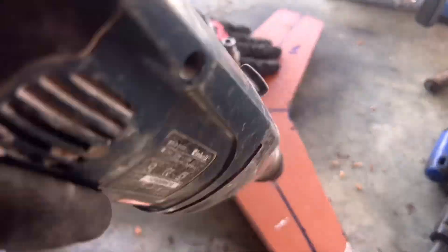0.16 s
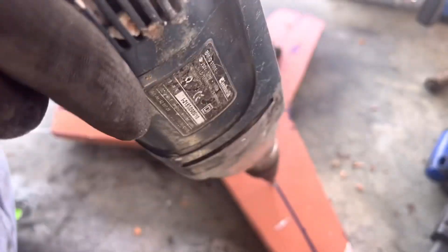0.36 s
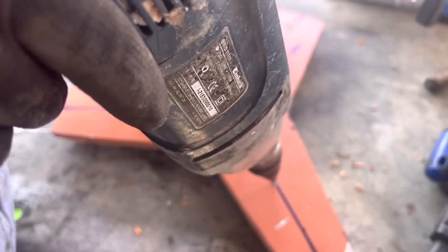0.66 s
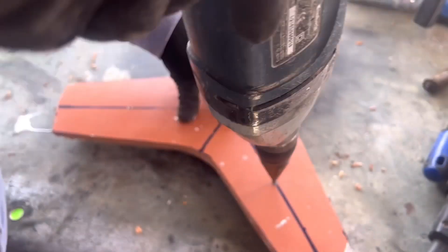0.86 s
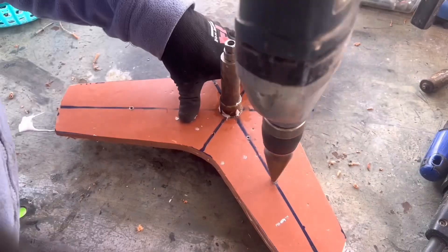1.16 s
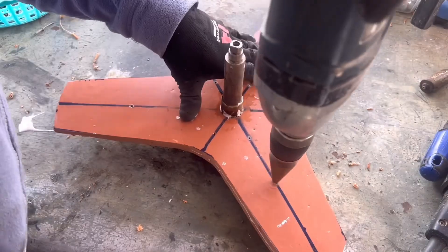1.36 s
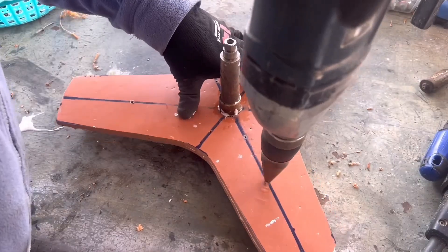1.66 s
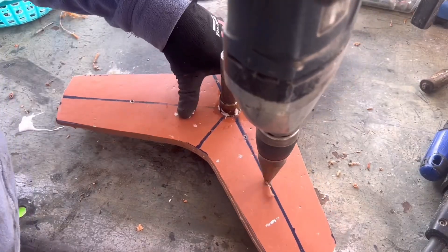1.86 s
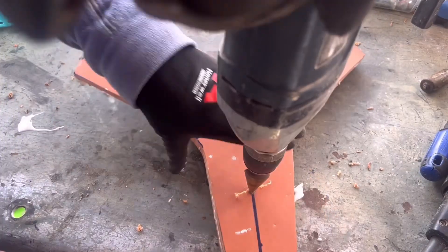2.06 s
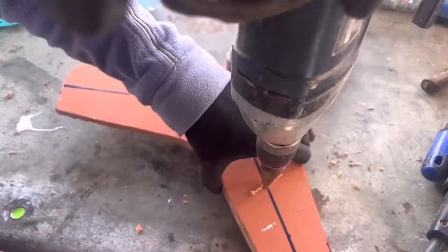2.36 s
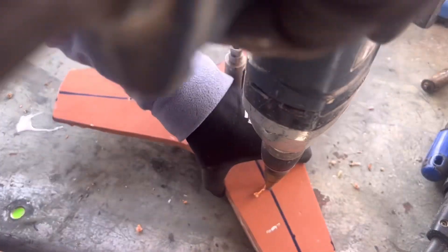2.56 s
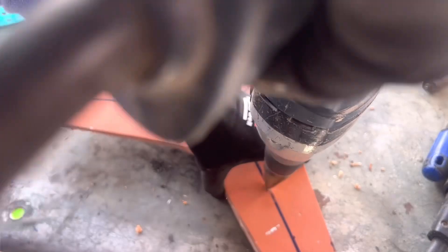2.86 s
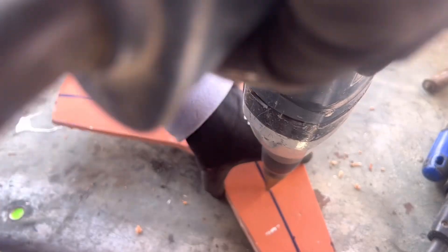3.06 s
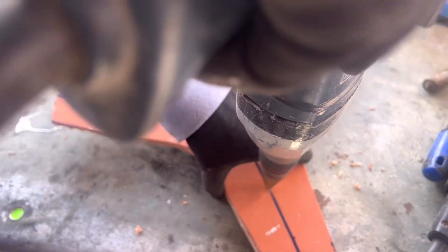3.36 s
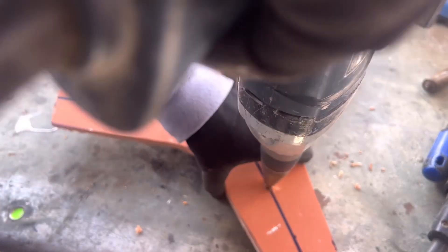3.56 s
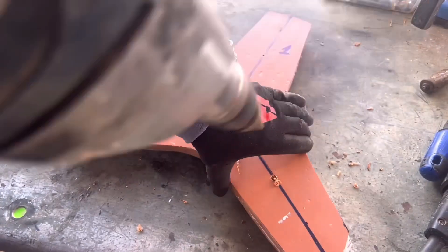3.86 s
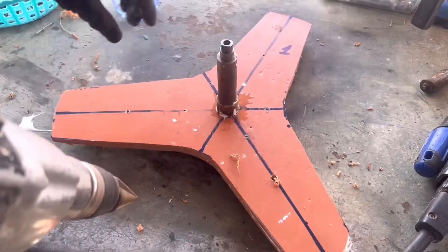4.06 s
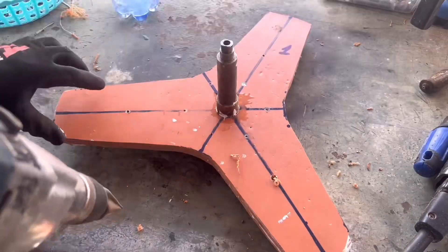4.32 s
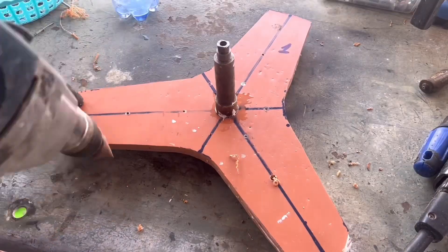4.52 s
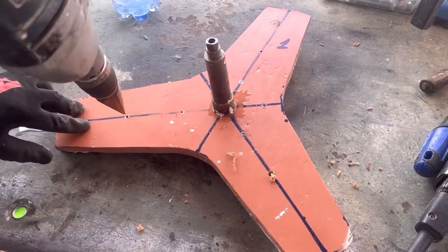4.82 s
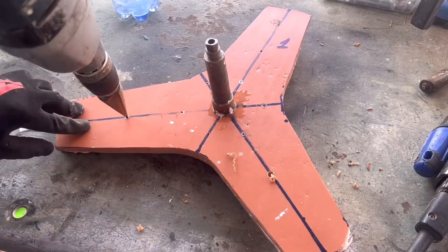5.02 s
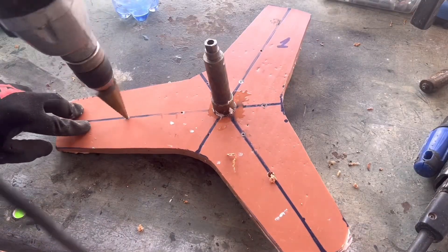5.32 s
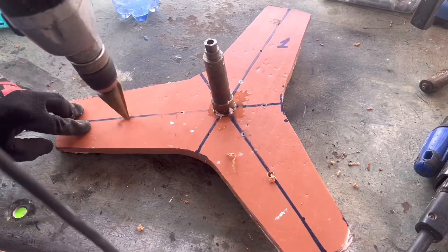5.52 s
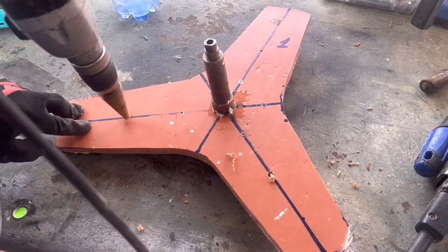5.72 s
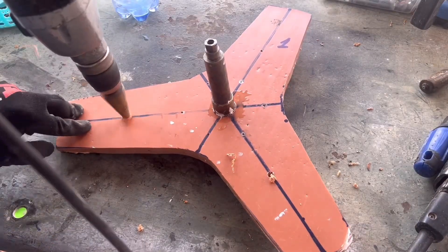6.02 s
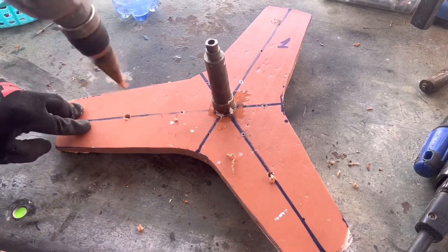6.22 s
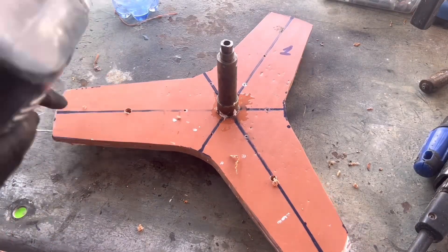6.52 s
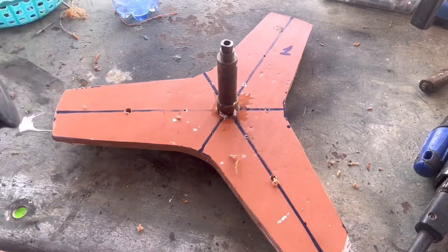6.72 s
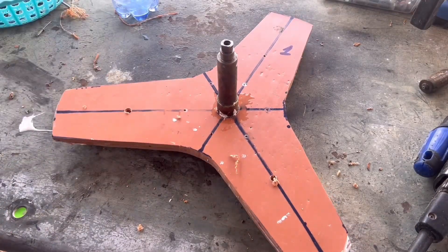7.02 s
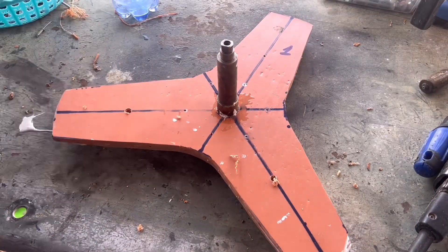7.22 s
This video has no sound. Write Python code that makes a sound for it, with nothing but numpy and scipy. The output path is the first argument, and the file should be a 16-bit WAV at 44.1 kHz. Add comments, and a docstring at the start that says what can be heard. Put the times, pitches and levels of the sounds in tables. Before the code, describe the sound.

An electric hand drill bores into a thick plastic plate in four short runs, whining down after each, between close knocks.

```python
"""Gloves rustle and a thick plastic plate knocks and squeaks on a workbench, close to the microphone.
Then a hand drill bores into the plate in four short runs. Each pull of the trigger kicks the rotor up
to speed with a hum, a rasp and chattering brushes; let go, it coasts down with falling gear and
commutator whines. Between the runs drill and plate are shifted about. Bench and walls answer briefly."""
import sys
import numpy as np
from scipy import signal
from scipy.fft import rfft, irfft, next_fast_len
from scipy.io import wavfile
from scipy.ndimage import uniform_filter1d

SR = 44100
rng = np.random.default_rng(int(sys.argv[2]) if len(sys.argv) > 2 else 0)


def materialize(psi):
    """Save the field psi as 16-bit PCM at rate SR to the path in sys.argv[1].

    A 1-D psi becomes a single channel; in a 2-D psi each row is a channel.
    """
    bounded = np.clip(np.atleast_2d(psi).T, -1, 1)
    quanta = np.round(bounded * 32767).astype(np.int16)
    wavfile.write(sys.argv[1], SR, quanta)


N = 325458
TIME = np.arange(N) / SR
BAND_LIMIT_HZ = 16000
CRUISE = 400  # reference rotor speed, turns a second

def amp(db):
    """Decibels to gain."""
    return 10 ** (np.asarray(db) / 20)

def unit(x):
    """Scales to rms 1."""
    return x / np.sqrt(np.mean(x ** 2) + 1e-20)

def timeline(points):
    """Joins (t/s, value) points by straight lines."""
    return np.interp(TIME, *np.transpose(points))

def gain_at(points, hz):
    """Gain of a spectrum, on a log-frequency axis."""
    f, db = np.transpose(points)
    return amp(np.interp(np.log(hz + 1), np.log(f), db))

def colour(x, points):
    """Filters x by a spectrum."""
    size = next_fast_len(x.shape[-1])
    gain = gain_at(points, np.fft.rfftfreq(size, 1 / SR))
    return irfft(rfft(x, size) * gain, size)[..., :x.shape[-1]]

def noise(points, size):
    """Noise of rms 1 with a spectrum."""
    return unit(colour(rng.standard_normal(size), points))

def wander(per_s, t=TIME):
    """A random curve of about rms 1 with so many bends a second."""
    knots = np.arange(0, t[-1] + 1, 1 / per_s)
    return np.interp(t, knots, rng.standard_normal(len(knots))) * np.sqrt(3 / 2)

def resonate(x, hz, width):
    """One resonance of gain 1."""
    return signal.lfilter(*signal.iirpeak(hz, hz / width, fs=SR), x)

def whine(cycles, flutter, jitter, slips_per_s=90):
    """A tone unsteady in strength and phase; fast, wide slips make it rough."""
    strength = np.sqrt(2) * unit(1 + flutter * wander(60))
    return strength * np.sin(2 * np.pi * (cycles + rng.random()) + jitter * wander(slips_per_s))

def turns(speed):
    """Turns of the rotor so far."""
    return np.cumsum(speed) / SR

def octaves(speed):
    """Doublings of speed above CRUISE."""
    return np.log2(speed / CRUISE + 1e-4)

# The workshop's reflections at the microphone: f/Hz, level/dB
REFLECTIONS = [(100, -16), (500, -17), (1200, -11), (4000, -10), (10000, -8.5), (16000, -8)]
def workshop(x, t60=0.071, delay_s=.001):
    """Bench and walls add short reflections, different at each side."""
    t = np.arange(SR // 3) / SR
    taps = rng.standard_normal((2, len(t))) * (rng.random((2, len(t))) < .1)
    taps *= (t > delay_s) * amp(-60 * t / t60)
    taps = colour(taps / np.linalg.norm(taps, axis=1, keepdims=True), REFLECTIONS)
    return x + signal.fftconvolve(x, taps, axes=1)[:, :N]

# The drill's echo off the bench top: f/Hz, level/dB
BENCH_ECHO = [(200, -24), (600, -19), (1200, -13), (4000, -10), (9000, -7), (15000, -5)]
def bench_echo(x, delay_s=.005, sway_s=.0005):
    """The hand-held drill sways, so its echo keeps shifting, differently at each side."""
    echoes = np.array([np.interp(TIME - delay_s - sway_s * wander(5), TIME, x) for _ in range(2)])
    return x + colour(echoes, BENCH_ECHO)

# Dull noise, for both the room and the sliding plate: f/Hz, level/dB
DULL_NOISE = [(29, -78.5), (50, -36.5), (96, -14), (160, -6), (254, 0.5), (409, -12), (460, -5.5),
              (597, -16), (731, -3), (858, -14), (963, -11), (1110, -18.5), (1230, -11), (1600, -20.5),
              (2080, -45.5), (3520, -120)]
def room_tone(db=-77):
    """A faint, low rush lies behind the bench."""
    return amp(db) * noise(DULL_NOISE, N)

# Gloves, close up: f/Hz, level/dB
GLOVES = [(820, -33), (1400, -19), (1580, -8), (2060, -14), (2600, -16.5), (4200, -17), (6650, -21.5),
          (15000, -23)]
# Light handling at the bench: t/s, length/s, slide/dB, rustle/dB
RUBS = [(0.0, 0.084, -70.5, -62.5), (0.094, 0.29, -77.5, -75), (0.345, 0.21, -66.5, -65),
        (0.559, 0.5, -71, -73), (1.072, 0.18, -70.5, -65), (2.15, 0.92, -78, -74),
        (4.929, 0.78, -86, -80.5), (6.72, 0.62, -81.5, -83), (7.207, 0.063, -69, -44),
        (7.26, 0.16, -62, -55)]
def rubbing(length, slide_db, rustle_db, ticks_per_s=30, edge_s=0.001):
    """The plate slides dully on the bench while gloves rustle and tick on the drill."""
    t = np.arange(0, length, 1 / SR)
    slide = amp(slide_db + 8 + 2.5 * wander(40.8, t)) * noise(DULL_NOISE, len(t))
    slips = rng.exponential(1, len(t)) * (rng.random(len(t)) < ticks_per_s / SR)
    grains = unit(signal.lfilter([1], [1, -np.exp(-1 / (0.0017 * SR))], slips))
    rustle = amp(rustle_db - 1) * unit(1 + .4 * grains) * noise(GLOVES, len(t))
    return (slide + rustle) * np.minimum(np.minimum(t, length - t) / edge_s, 1)

# Squeaks and hollow judders of the plastic: t/s, length/s, f/Hz, width/Hz, level/dB
SQUEAKS = [(0.372, 0.045, 1380, 150, -64), (0.407, .06, 740, 80, -61), (0.608, 0.021, 410, 120, -57),
           (0.663, 0.059, 1560, 200, -72), (0.707, 0.074, 740, 60, -63.5), (1.07, 0.16, 1300, 300, -62.5),
           (1.126, 0.045, 1576, 69.6, -57.5), (1.13, 0.076, 4000, 900, -70.5), (2.233, 0.043, 738, 60, -57),
           (2.507, 0.12, 1330, 39.4, -74), (2.616, .045, 720, 40, -65), (2.735, 0.087, 4120, 30.2, -75.5),
           (2.775, 0.11, 2015, 60.5, -77), (2.828, 0.17, 3900, 30, -76.5), (4.881, 0.058, 1500, 200, -67.5),
           (5.03, 0.026, 1380, 201, -64.5), (5.055, 0.027, 1410, 256, -59.5), (5.138, 0.024, 760, 79, -68),
           (5.24, 0.042, 600, 200, -70)]
def squeak(length, hz, width, db):
    """Plastic sticks and slips in a narrow band."""
    size = round(length * SR)
    ring = resonate(resonate(rng.standard_normal(size), hz, width), hz, width)
    return amp(db) * unit(ring * signal.windows.tukey(size, .5))

# Modes of the plate on the bench: f/Hz, width/Hz, level/dB
PLATE_MODES = [(162, 54, 6.5), (242, 45, 17), (332, 50, 6.5), (453.5, 43, 14.5), (656, 85, 8),
               (860, 93, -7.5)]
# The brighter parts of a knock: f/Hz, level/dB
CLACK = [(650, -26.5), (1100, -0.5), (1290, -3.5), (1460, -4), (2330, -5.5), (2540, -5.5), (3200, -9),
         (4160, -23), (7040, -120)]
TICK = [(1760, -36.5), (3000, -15), (3380, 3), (4910, 3.5), (6010, 1), (6770, -0.5), (9000, -4.5),
        (13400, -3.5), (15800, -7)]
# Close knocks and motor kicks: t/s, thud/dB, clack/dB, tick/dB, t60/s, thud tilt/(dB per octave)
KNOCKS = [(0.211, -78, -67, -65, 0.042, 0), (0.315, -54, -85, -85, 0.057, 3),
          (0.332, -42.5, -46.5, -56, 0.091, -1), (0.343, -37, -68, -60, 0.16, 3),
          (0.37, -43, -71, -71, 0.083, -11), (0.39, -63, -60, -58, 0.059, -6),
          (0.486, -40, -48.5, -54.5, 0.11, 0), (0.569, -52, -67, -65, 0.085, -2),
          (0.584, -51, -72, -73, 0.087, 2), (0.625, -51.5, -89, -90, 0.29, -9),
          (0.711, -53, -66, -67, 0.097, 8), (0.77, -47, -90, -90, 0.03, -2),
          (0.78, -46, -57.5, -66, 0.13, 7), (0.905, -52, -67, -59.5, 0.035, 3),
          (0.91, -52, -76, -67, .03, -5), (1.007, -45.5, -63, -60, 0.035, -8),
          (1.062, -62, -58, -47, 0.025, 4), (1.08, -70, -68, -55, .02, 0),
          (1.099, -47.5, -58, -68, 0.049, 7), (1.195, -58, -72, -63, 0.027, -5),
          (1.251, -30, -41.5, -34, 0.064, -9), (1.286, -31.5, -39.5, -33, 0.19, 10),
          (1.637, -36, -48, -39, 0.089, 4.5), (2.179, -58, -76, -73, 0.27, -12),
          (2.245, -52.5, -66, -66.5, 0.46, 1), (2.294, -61, -78, -83, 0.27, -8),
          (2.342, -57, -71, -71, 0.165, -5), (2.497, -77, -83, -67, 0.042, 1),
          (2.513, -77, -83.5, -69, .025, 0), (2.618, -63, -68, -71, 0.61, 18),
          (2.654, -64, -74, -64, 0.045, 9), (2.667, -74, -76, -64, 0.028, 0),
          (2.676, -56, -66, -81.5, 0.22, -14), (2.897, -38.5, -62, -52, 0.12, -1),
          (4.671, -53.5, -76, -85, 0.12, -1), (4.697, -53.5, -83, -79, 0.098, -12),
          (4.826, -54, -62.5, -65, 0.35, -7), (5.056, -60, -55, -67.5, 0.052, -7.5),
          (5.141, -67, -70, -75, 0.59, 16.5), (5.251, -57.5, -77, -82, 0.12, 12),
          (5.325, -82, -79, -72, .06, -2), (5.346, -82.5, -69, -58.5, 0.024, 4),
          (5.383, -49.5, -78, -76.5, 0.17, -7), (5.507, -74, -71.5, -59, 0.049, -2),
          (5.539, -42, -54.5, -54, 0.95, 5.5), (6.14, -35, -55, -44, 0.11, -33),
          (6.574, -45, -46.5, -50, 0.1, 1), (6.674, -40.5, -54, -56, 0.25, 5),
          (6.81, -55, -78, -75, 0.12, -11), (7.209, -27.5, -40, -44.5, 0.21, 11.5),
          (7.328, -37, -35.5, -33, 0.14, 10)]
def knock(thud_db, clack_db, tick_db, t60, tilt_db, rise_s=0.0012, dull_hz=1500):
    """A short rattling contact rings the plate; the higher clack and tick die sooner."""
    t = np.arange(SR // 3) / SR
    contact = rng.standard_normal(len(t)) * amp(-60 * t / t60)
    thud = sum(amp(db + tilt_db * np.log2(hz)) * resonate(contact, hz, width)
               for hz, width, db in PLATE_MODES)
    thud = signal.sosfilt(signal.butter(2, dull_hz, fs=SR, output="sos"), thud)
    thud /= np.sqrt(uniform_filter1d(thud ** 2, size=400).max())
    clack = noise(CLACK, len(t)) * amp(-60 * t / (t60 * 0.61))
    tick = noise(TICK, len(t)) * amp(-60 * t / (t60 * 0.52))
    gains = amp([thud_db - 5, clack_db + 4, tick_db + 6])
    return gains @ [thud, clack, tick] * (1 - np.exp(-t / rise_s))

# The chuck with the bit running free: t/s, length/s, f/Hz, width/Hz, level/dB
CHUCK_RINGS = [(1.723, 0.4, 3700, 520, -55), (4.15, 0.74, 5770, 600, -61.5), (6.349, 0.6, 4380, 430, -56)]
def chuck(length, hz, width, db):
    """The freed chuck rattles in one narrow resonance, unevenly."""
    ring = squeak(length, hz, width, db)
    return ring * unit(1 + .4 * wander(120, TIME[:len(ring)]))

# Trigger pulls: press/s, release/s, squeeze/s, stall push/(turns/s^2), free speed/(turns/s),
# friction/(turns/s^2), drag at CRUISE/(turns/s^2)
PULLS = [(1.248, 1.4, .007, 6300, 570, 426, 322), (2.897, 3.77, .066, 3640, 493, 325, 108),
         (5.504, 5.632, .023, 7900, 470, 447, 0), (5.912, 6.187, .009, 5109, 649, 302, 237)]
def rotor(step_s=.001, let_go_s=.045, hard_start=5000):
    """Speed and torque: the motor's push falls as it speeds up; friction and drag brake it."""
    t = np.arange(0, N / SR, step_s)
    speed, push = np.zeros((2, len(t)))
    for press, release, squeeze, stall, free, friction, drag in PULLS:
        trigger = np.clip(np.minimum((t - press) / squeeze, (release - t) / let_go_s), 0, 1)
        for i in range(round(press / step_s), len(t)):
            v = speed[i - 1]
            push[i] = stall * trigger[i] * max(1 - v / free, 0)
            speed[i] = max(v + step_s * (push[i] - friction - drag * (v / CRUISE) ** 3), 0)
    return np.interp(TIME, t, speed), np.interp(TIME, t, push / hard_start)

# Hum of the windings: f/Hz, level/dB
HUM = [(280, -3.5), (560, -7), (840, -23.5)]
def winding_hum(torque):
    """The windings hum at a fixed pitch with the current they draw, loudest at the start of a run."""
    return torque ** 1.2 * sum(amp(db) * whine(hz * TIME, flutter=0.17, jitter=0.17) for hz, db in HUM)

def spindle(speed, ratio=.415):
    """The second, slower gear stage sings low and fades fast as the speed falls."""
    return amp(-62 + 24 * octaves(speed)) * whine(ratio * turns(speed), flutter=0.33, jitter=0.3)

# Lower fan tones: multiple of rotor speed, level at CRUISE/dB, slope/(dB per octave of speed)
FAN_TONES = [(4, -48.5, 18), (7, -58.5, 30)]
# The blade tone through the vents' resonance: f/Hz, level/dB
VENTS = [(2400, -82), (2800, -60), (3100, -49.5), (3400, -47), (4000, -41.5)]
def fan(speed, coasting, siren_gain, blades=8, coast_db=-6.5):
    """The fan's tones rise with its speed, like a siren, and ease when the trigger is let go."""
    drone, wobble = [amp(db + slope * octaves(speed)) * whine(k * turns(speed), flutter=0.4, jitter=.6)
                     for k, db, slope in FAN_TONES]
    siren = gain_at(VENTS, blades * speed) * whine(blades * turns(speed), flutter=0.4, jitter=.33)
    return amp(coast_db * coasting) * (drone + siren_gain * (siren + wobble))

# Resonances of the gear case: f/Hz, level/dB
GEAR_CASE = [(60, -102.5), (160, -85.5), (240, -74), (350, -61), (420, -57), (520, -44), (650, -47.5),
             (740, -57.5), (850, -49.5), (960, -48.5)]
# Swells of the pinion whine: t/s, level/dB
PINION_LEVEL = [(1.3, 2.5), (1.5, -2.5), (1.9, 5), (3.0, -3), (3.15, 7.5), (3.3, -0.5), (3.7, -4),
                (3.85, 1), (4.0, 3), (4.2, -4), (4.4, -2), (4.62, 4), (5.8, -7), (6.0, 2.5), (6.3, 5),
                (6.4, -15), (6.7, -11)]
def pinion(speed):
    """The pinion whines at twice the rotor speed, gliding through the gear case's resonances."""
    level = amp(timeline(PINION_LEVEL)) * gain_at(GEAR_CASE, 2 * speed)
    return level * whine(2 * turns(speed), flutter=0.25, jitter=.3)

# The drill at the microphone, as it moves and the arm screens it: t/s, level/dB
PRESENCE = [(1.3, 4), (1.37, 2.5), (1.48, 2), (1.75, 1), (2.05, 3), (2.95, 4), (3.15, 2.5), (3.45, -3.5),
            (3.8, -4.5), (4.05, 2.5), (4.3, -3), (4.8, 2.5), (4.92, 11), (5.5, -2), (5.7, 2.5), (6.1, -1),
            (6.45, -1), (6.8, -1), (7.15, -2)]
def presence(speed, stall_speed=31):
    """Gain of the drill's rubbing, which dies out as the rotor stops."""
    return amp(timeline(PRESENCE)) * np.tanh(speed / stall_speed)

# The drill's rubbing noises, close up: f/Hz, level/dB
RUMBLE = [(30, -54.5), (60, -51), (105, -20), (190, 2.5), (350, -3.5), (550, 0), (800, 1.5), (1200, -10.5)]
RATTLE = [(470, -16.5), (800, -6.5), (976, -14), (1220, -12), (1500, -8), (1900, -0.5), (2120, -2),
          (2430, -6), (3000, -6.5), (3900, -17.5), (6600, -120)]
RASP = [(1710, -42.5), (2900, -8), (3730, 5), (4030, 3), (4370, 3.5), (5020, 1.5), (5750, 3.5), (6050, 2),
        (6450, -4.5), (7180, -3), (7500, -6), (9750, -13.5), (16500, -120)]
WHIRR = [(1710, -47), (2900, -22), (3330, -10), (3680, -12), (4330, 2.5), (5060, -1.5), (5750, 5.5),
         (6220, 2), (7500, 2), (9750, -63.5), (16500, -120)]
HISS = [(4410, -24.5), (7500, -10), (8240, -3), (10700, -2), (13200, 1.5), (15800, -3)]
# Their level laws: base/dB, per octave of speed/dB, by strain/dB, by bite/dB
RUMBLE_LAW = (-62, 4, 10, 14)
RATTLE_LAW = (-48.5, 11, 1.5, 10)
RASP_LAW, HISS_LAW = (-47, 7, 5.5, 11.5), (-41, 7.5, 4.5, 7)
# The bit in the plastic: t/s, depth/(0-1)
BITE = [(2.1, 0.81), (3.7, 1), (4.05, 0.3), (4.3, 0.04), (5.5, 0.59), (5.9, 0.7), (6.2, 0.73), (6.45, 0.14)]
# How hard the drill shakes the plate: t/s, level/dB
SHAKE = [(1.3, -9), (1.65, -4), (1.9, -1.5), (2.1, 2), (3.0, 6.5), (3.15, 2.5), (3.35, -1), (3.7, -4),
         (3.9, -4), (4.0, 8), (4.1, 3), (4.4, -9.5), (5.6, 2.5), (5.95, 3), (6.15, -3), (6.33, 6.5),
         (6.6, -9)]
def friction_bands(speed, torque, mesh_speed=130):
    """(Gain, spectrum) of each rubbing noise; with the bit free the rasp turns into a whirr."""
    bite = timeline(BITE)
    strain = np.sqrt(torque) * np.tanh(speed / mesh_speed)  # heard only once the gears move
    rumble, rattle, rasp, hiss = [
        presence(speed) * amp(db + by_speed * octaves(speed) + by_strain * strain + by_bite * bite)
        for db, by_speed, by_strain, by_bite in (RUMBLE_LAW, RATTLE_LAW, RASP_LAW, HISS_LAW)]
    rumble *= amp(timeline(SHAKE) + 3 * wander(20))
    return [(rumble, RUMBLE), (rattle, RATTLE), (rasp * np.sqrt(bite), RASP),
            (rasp * np.sqrt(1 - bite), WHIRR), (hiss, HISS)]

def housing_tone(speed, bands, multiple, db, jitter, ring=None, slips_per_s=90):
    """A rotor tone, set against the noise in 100 Hz: both swell at the housing's resonances."""
    grid = np.arange(0, SR / 2, 100)
    coarse = slice(None, None, 64)
    hz = multiple * speed[coarse]
    power = sum((level[coarse] * gain_at(shape, hz)) ** 2 / np.sum(gain_at(shape, grid) ** 2)
                for level, shape in bands)
    gain = amp(db) * np.sqrt(power) * (hz < BAND_LIMIT_HZ) * (gain_at(ring, hz) if ring else 1)
    tone = whine(multiple * turns(speed), flutter=0.45, jitter=jitter, slips_per_s=slips_per_s)
    return np.interp(TIME, TIME[coarse], gain) * tone

# Tones of the rotor slots and the bearing: multiple of rotor speed, level/dB
SLOT_TONES = [(15.9, -3), (31.7, -4)]
BEARING_TONES = [(7, 0), (13.9, 2), (21, -5), (33.7, -4), (41.2, -5), (63.4, -3)]
# The front housing that passes them: f/Hz, level/dB
FRONT_HOUSING = [(400, -5), (750, -1), (1100, 2), (1500, -4), (2200, -8), (3100, -8), (3750, 3), (4500, 2),
                 (5400, -2), (6800, 0)]
# The bearing's growl: speed/(turns/s), level/dB
GROWL = [(35, -15), (75, 11), (150, 8), (260, 1), (380, 2.5)]
def slots_and_bearing(speed, bands, coasting):
    """The slots whine throughout a run; the bearing growls once the rotor coasts and slows."""
    slots = sum(housing_tone(speed, bands, k, db, jitter=.8, ring=FRONT_HOUSING) for k, db in SLOT_TONES)
    growl = sum(housing_tone(speed, bands, k, db, jitter=1.3, ring=FRONT_HOUSING, slips_per_s=170)
                for k, db in BEARING_TONES)
    return slots + coasting * gain_at(GROWL, speed) * growl

def brush_song(speed, bands, bars=24):
    """Brushes pressed on the commutator's bars sing one note."""
    return housing_tone(speed, bands, bars, db=9, jitter=0.3)

# Whistles of the commutator: multiple of rotor speed, level/dB
WHISTLES = [(24, -6), (47.9, 7), (65.8, 1), (71.5, 1), (95.5, 1)]
# Ring of the brush holders: f/Hz, level/dB
BRUSH_RING = [(2500, -22), (3700, -7), (4700, 2), (5800, 7.5), (7200, 4), (8200, 6), (10000, 7.5),
              (12000, 8), (14000, 5.5), (16000, -1)]
def commutator_whistle(speed, bands):
    """Clean gliding tones fade in and out across the many narrow modes of the housing."""
    whistle = np.zeros(N)
    for k, db in WHISTLES:
        tone = housing_tone(speed, bands, k, db, jitter=.25, ring=BRUSH_RING)
        whistle += tone * unit(amp(2.2 * np.clip(wander(30), -2, 1)))
    return whistle

# Partials of the gear teeth: multiple of rotor speed, level/dB
GRIND = [(6, -3), (7, -1), (10, -1), (11, -4)]
def gear_grind(speed, bands):
    """The loaded teeth grind in a stack of rough partials."""
    return sum(housing_tone(speed, bands, k, db, jitter=0.95, slips_per_s=170) for k, db in GRIND)

# Partials of the chatter: multiple of rotor speed, level/dB
CHATTER = [(13.9, -1), (14.7, -2), (15.8, 0), (20.6, -2), (23.7, 7.5)]
# Brush holder resonances that it meets: f/Hz, level/dB
CHATTER_RING = [(3000, -8), (4800, -3), (5400, 3), (5900, 9), (6500, 3), (7300, 3), (8200, 5), (9200, 1),
                (10300, 2), (11300, 7), (12100, 11), (13000, 2)]
def brush_chatter(speed, bands):
    """Under torque the brushes chatter, flaring up at the resonances of their holders."""
    return sum(housing_tone(speed, bands, k, db, jitter=0.95, ring=CHATTER_RING, slips_per_s=300)
               for k, db in CHATTER)

def brush_sparks(speed, ring_s=.006):
    """The brushes spark twice a turn; each stroke rings briefly in the many modes of the housing."""
    period = SR / (2 * speed + 1)
    away = ((2 * turns(speed) + .5) % 1 - .5) * period  # samples from the nearest stroke
    clicks = np.sinc(away) * np.exp(-(away / 8) ** 2)
    clicks *= np.sqrt(period) * np.tanh(speed / CRUISE * 4)
    t = np.arange(0, ring_s, 1 / SR)
    ring = rng.standard_normal(len(t)) * amp(-30 * t / ring_s)
    return signal.oaconvolve(clicks, ring / np.linalg.norm(ring))[:N]

# Gain of the sparks against the noise while coasting: rumble, rattle, rasp, whirr, hiss
SPARK_SHARES = (0, .05, .13, .17, .22)
# Loose teeth in the gear case: f/Hz, level/dB
BACKLASH = [(700, -37.5), (1000, -7.5), (1220, -4.5), (1450, -11), (1900, -21.5)]
def friction_noise(speed, bands, coasting, throb=0.076, flicker=0.1):
    """Rubbing and sparks throb with each turn; unloaded teeth rattle while coasting."""
    sparks = brush_sparks(speed) * (1 + coasting) / 2
    rub = sum(level * unit(colour(rng.standard_normal(N) + share * sparks, shape))
              for (level, shape), share in zip(bands, SPARK_SHARES))
    backlash = coasting * presence(speed) * amp(-53 + 9.5 * octaves(speed)) * noise(BACKLASH, N)
    pulsing = (1 + throb * np.cos(2 * np.pi * turns(speed))) * np.exp(flicker * wander(500))
    return (rub + backlash) * unit(pulsing)

# The side of the housing that faces the microphone, one row a hole: from t/s, [(f/Hz, level/dB)]
ANGLES = [(0, [(1900, 2), (2400, 1), (3100, 0.5), (3600, 1.5), (4000, 2), (4500, 2), (5100, 0.5), (5700, 1),
          (6700, 2.5), (7700, 1), (8300, 3.5), (9000, 1), (11000, 0.5), (14000, 0), (14900, 0.5),
          (15600, -2.5)]), (2.5, [(3000, 0.5), (3900, 0.5), (5000, -.5), (5900, 2), (6350, -1), (6750, 4.5),
          (7200, -3), (7900, 6.5), (8500, 2), (10200, -1), (12300, -1), (13700, 1), (14800, 2),
          (15600, -2.5)]), (5.2, [(1500, 0.5), (1850, -2), (2200, -1), (2700, -1), (3300, -2), (3900, 2),
          (4450, -5), (5100, 2.5), (5700, -0.5), (6250, 0), (6700, 2), (7500, -3.5), (8300, -2),
          (9500, 0.5), (10500, -2.5), (11800, 2.5), (13400, -3), (14700, 4), (15500, -3)])]
def held_at_angle(x):
    """Colours the drill by the angle at which it is held over each hole."""
    hole = np.searchsorted([s for s, _ in ANGLES[1:]], TIME)
    return sum(colour(x * (hole == i), points) for i, (_, points) in enumerate(ANGLES))

# What the grip brings out, one row a pull: hum/dB, side load/dB, whistle/dB, siren/dB
GRIPS = [(-39.5, 6, -2, -4), (-28.5, -9, 2.5, 0), (-56, 2, -11, -4), (-62, -8, 3.5, 5.5)]
def drill(speed, torque):
    """One rotor drives the drill's noises and tones, close to the microphone."""
    coasting = np.clip(-np.gradient(speed) * SR / 250, 0, 1)
    effort = np.minimum(2 * torque, 1)
    pull = np.searchsorted([row[0] for row in PULLS[1:]], TIME)
    hum_gain, side_load, whistle_gain, siren_gain = uniform_filter1d(amp(GRIPS)[pull].T, size=400)
    # a side load keeps the brushes pressed on the bars even while coasting
    pressed = (1 - coasting) * (1 - effort) + .5 * coasting * side_load
    bands = friction_bands(speed, torque)
    housing = friction_noise(speed, bands, coasting)
    housing += effort * brush_chatter(speed, bands)
    housing += (1 - coasting) * gear_grind(speed, bands)
    housing += pressed * brush_song(speed, bands)
    housing += coasting * whistle_gain * commutator_whistle(speed, bands)
    housing += side_load * slots_and_bearing(speed, bands, coasting)
    tones = pinion(speed) + fan(speed, coasting, siren_gain) + spindle(speed)
    return held_at_angle(housing) + tones + hum_gain * winding_hum(torque)

def scene(level_db=-2.5, right_db=-0.11):
    """A quiet workshop, handling on the bench and the drill, in close stereo."""
    mix = room_tone()
    for source, rows in (chuck, CHUCK_RINGS), (knock, KNOCKS), (squeak, SQUEAKS), (rubbing, RUBS):
        for start_s, *settings in rows:
            sound = source(*settings)
            part = mix[round(start_s * SR):][:len(sound)]
            part += sound[:len(part)]
    balance = amp([[-right_db], [right_db]])
    return amp(level_db) * workshop(mix + bench_echo(drill(*rotor()))) * balance

def record(dry, low_cut_hz=94):
    """The microphone's bass cut and the recorder's band limit."""
    thin = signal.sosfilt(signal.butter(4, low_cut_hz, "highpass", fs=SR, output="sos"), dry)
    lowpass = signal.firwin(511, BAND_LIMIT_HZ, window=("kaiser", 9), fs=SR)
    return signal.oaconvolve(thin, lowpass[None], "same")

dry = scene()
out = record(dry)
materialize(out)
```